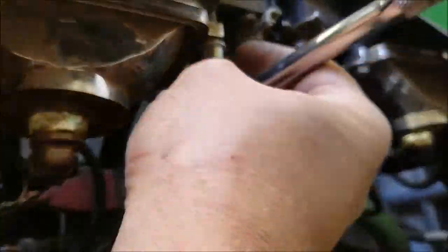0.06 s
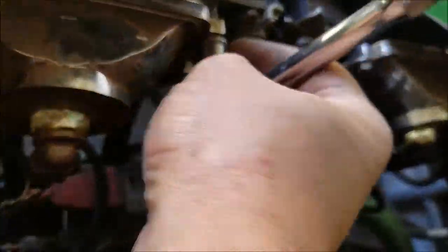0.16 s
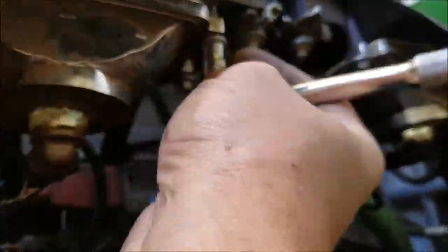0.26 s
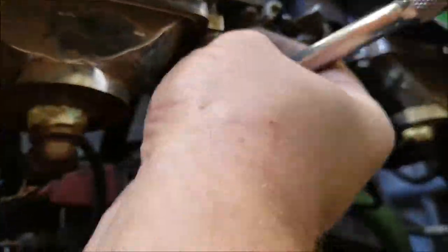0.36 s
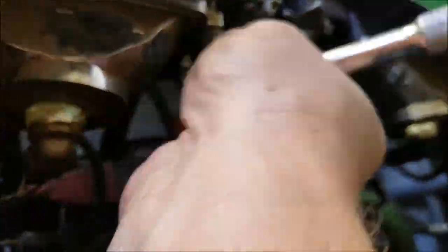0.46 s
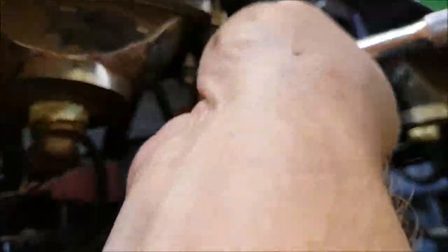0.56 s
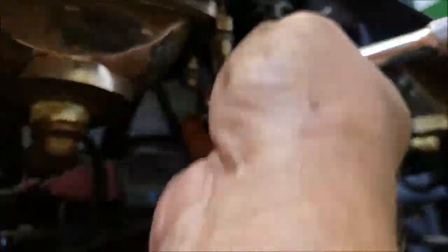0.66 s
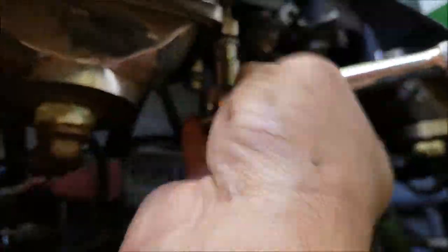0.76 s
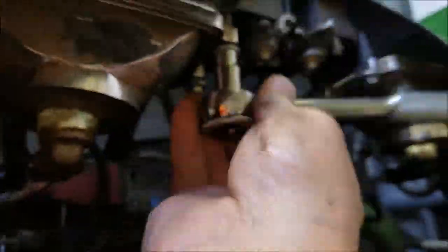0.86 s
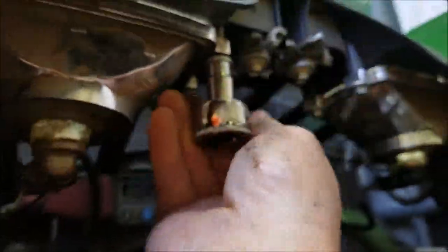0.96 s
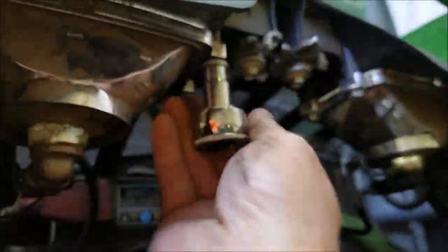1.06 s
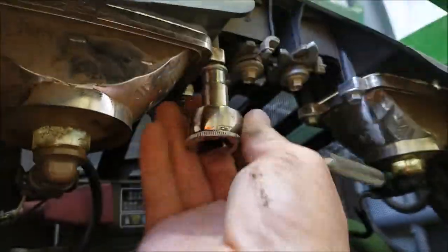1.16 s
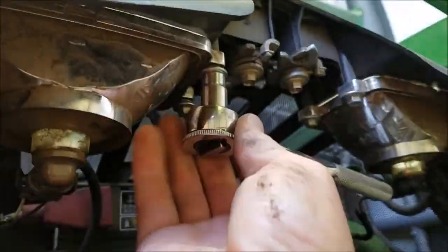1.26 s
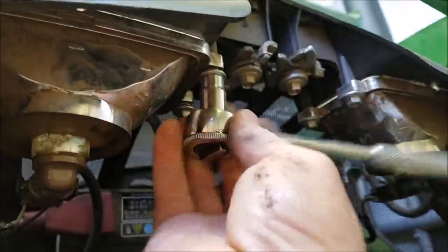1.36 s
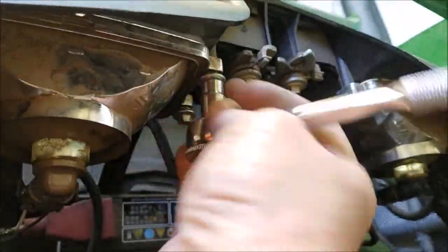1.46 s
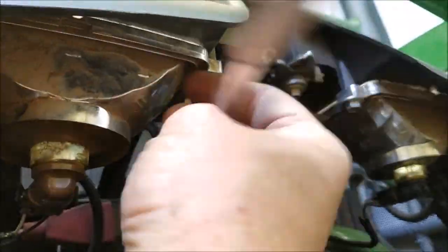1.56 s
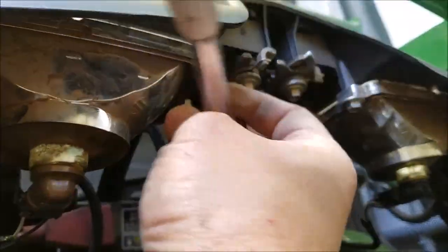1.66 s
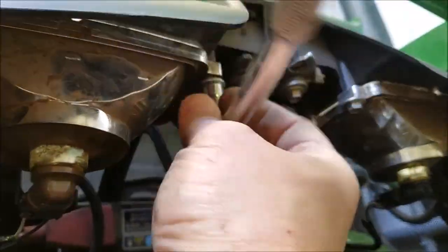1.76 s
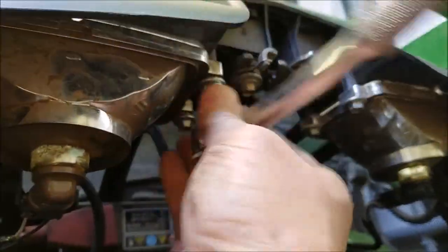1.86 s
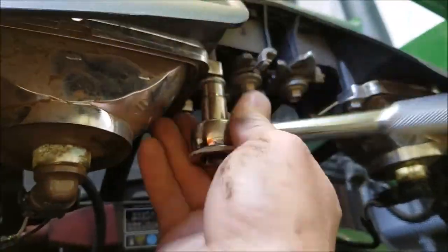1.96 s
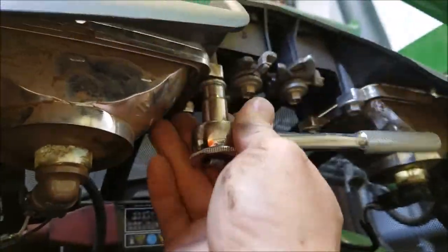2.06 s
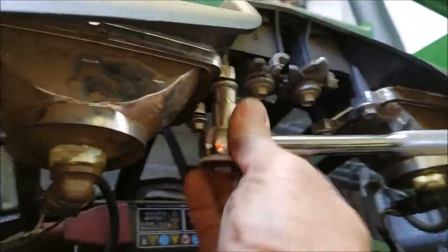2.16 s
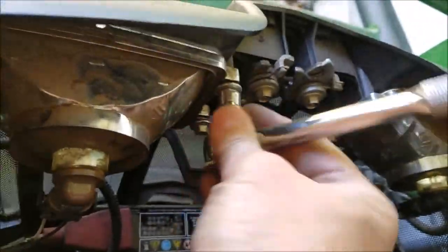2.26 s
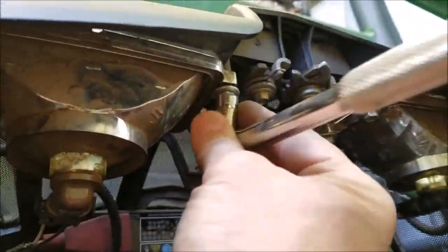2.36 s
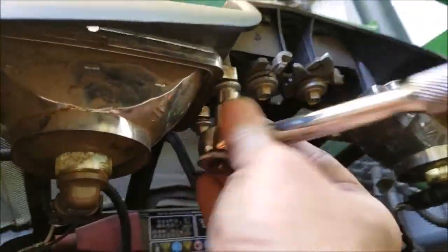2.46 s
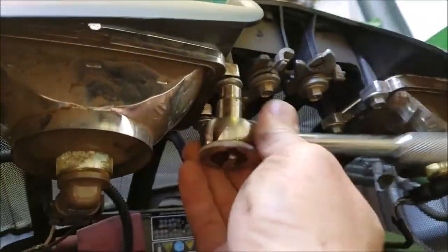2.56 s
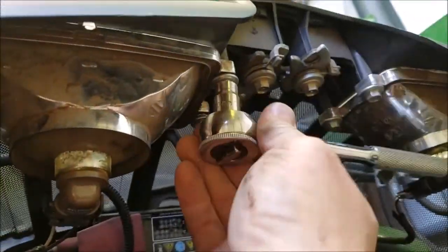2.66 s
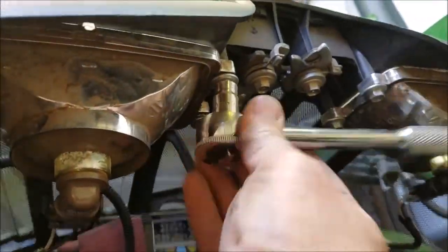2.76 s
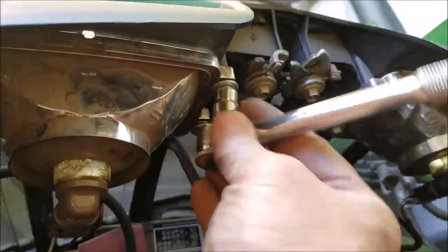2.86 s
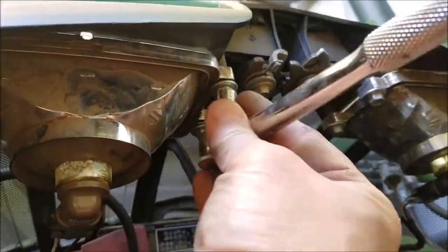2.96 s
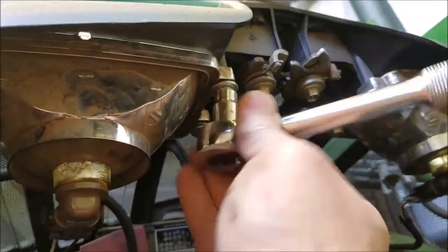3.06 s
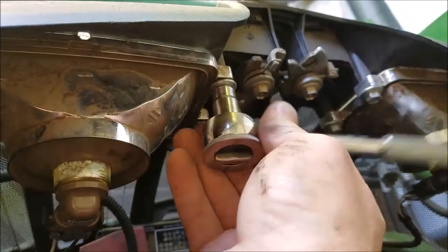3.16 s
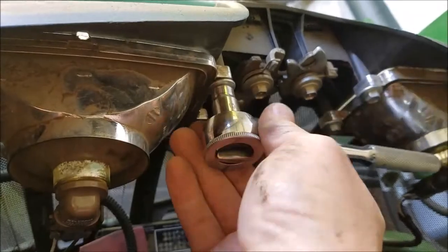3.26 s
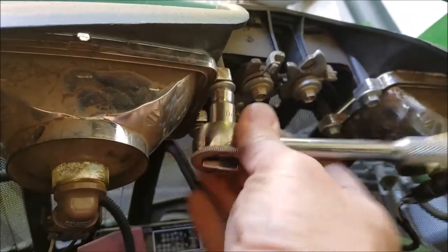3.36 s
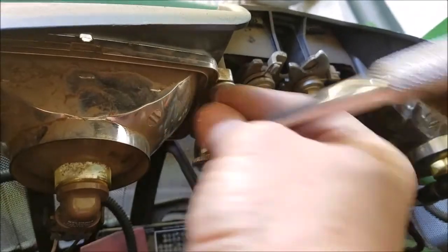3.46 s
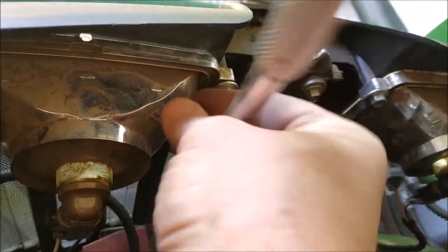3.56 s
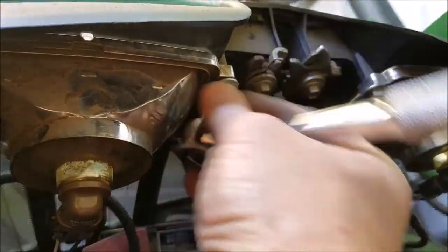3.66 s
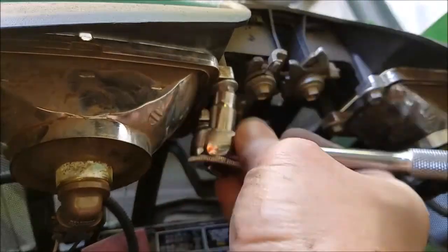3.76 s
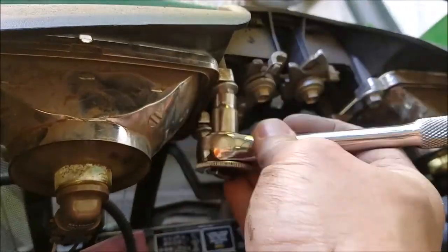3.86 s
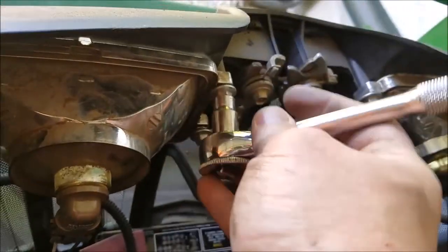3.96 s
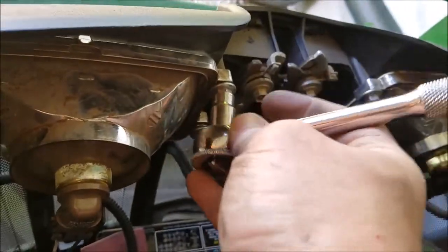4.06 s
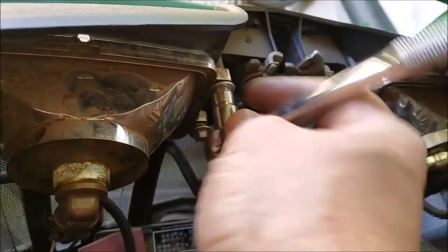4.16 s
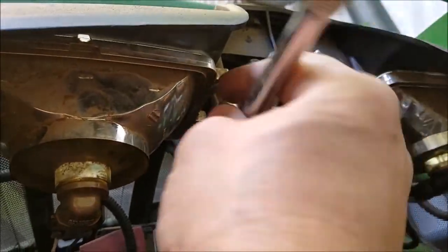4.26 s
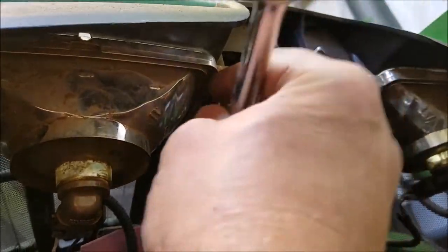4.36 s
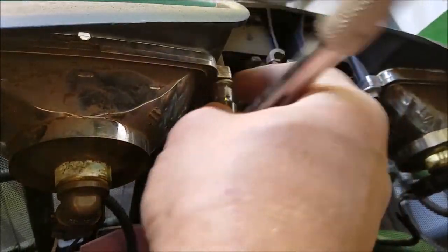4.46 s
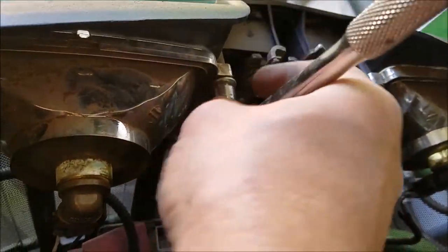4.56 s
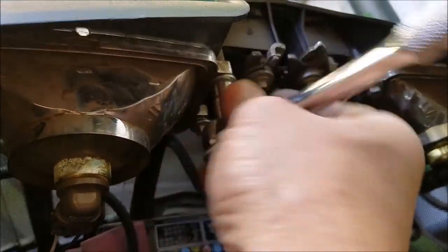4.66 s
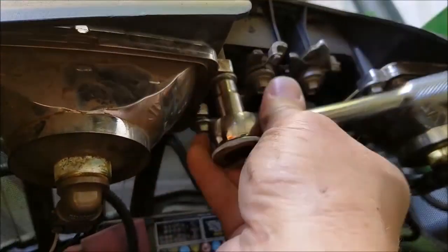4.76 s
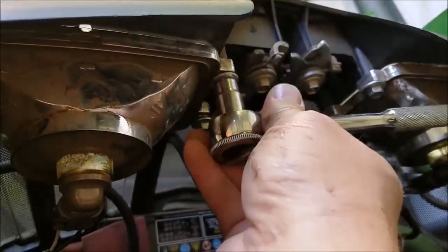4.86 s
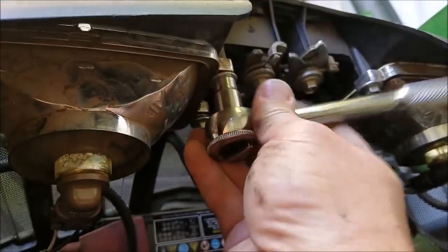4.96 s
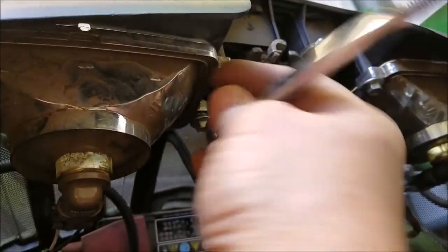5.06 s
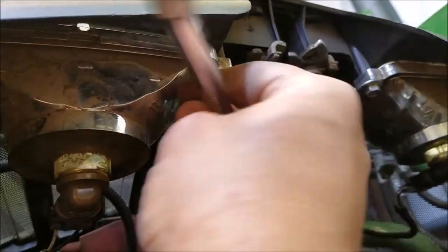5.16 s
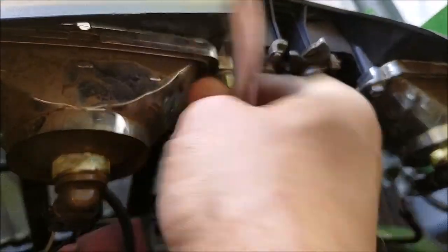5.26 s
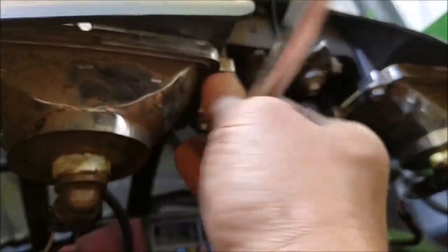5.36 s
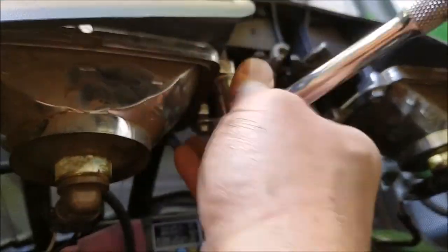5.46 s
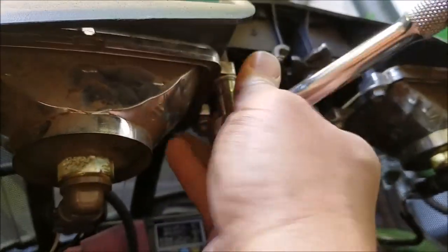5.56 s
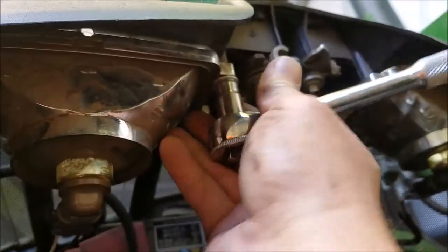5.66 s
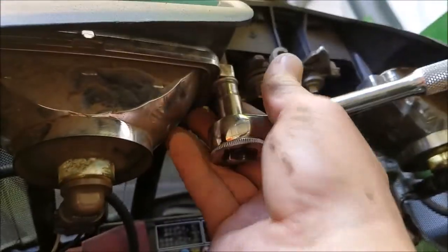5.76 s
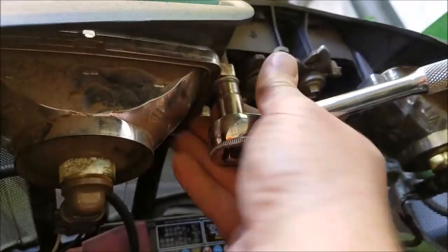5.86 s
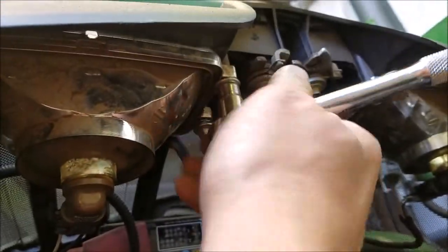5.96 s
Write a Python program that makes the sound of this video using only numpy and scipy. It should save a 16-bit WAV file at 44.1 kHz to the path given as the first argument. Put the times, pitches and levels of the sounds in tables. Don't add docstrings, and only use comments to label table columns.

```python
import sys
import numpy as np
from scipy import signal
from scipy.fft import rfft, irfft, next_fast_len
from scipy.io import wavfile
from scipy.ndimage import uniform_filter1d

SR = 44100
rng = np.random.default_rng(int(sys.argv[2]) if len(sys.argv) > 2 else 0)


def invert_db(level):
    return 10 ** (np.asarray(level, dtype=float) / 20)


def persist_wave(psi):
    counts = np.round(np.clip(psi, -1, 1) * 32767).astype(np.int16)
    wavfile.write(sys.argv[1], SR, np.atleast_2d(counts).T)


N = 265614


def evened(x):
    return x / np.sqrt(np.mean(x ** 2) + 1e-20)


def peaked(x, size):
    return x / np.sqrt(uniform_filter1d((x ** 2).mean(0), size).max())


def smoothed(x, size):
    return uniform_filter1d(uniform_filter1d(x, size), size)


def read(points, hz):
    f, value = np.transpose(points)
    return np.interp(np.log(hz + 1), np.log(f + 1), value)


def coloured(x, points):
    size = next_fast_len(x.shape[-1])
    gain = invert_db(read(points, np.fft.rfftfreq(size, 1 / SR)))
    return irfft(rfft(x, size) * gain, size)[..., :x.shape[-1]]


def band(x, lo_hz, hi_hz):
    return signal.sosfilt(signal.butter(3, [lo_hz, hi_hz], "band", fs=SR, output="sos"), x)


def ring(modes, t, spread_db, detune, rough):
    hz, db, t60 = np.transpose(modes)[:, :, None]
    luck = rng.standard_normal((3, 2, len(modes), 1))
    size = invert_db(db + spread_db * luck[0])
    steps = np.repeat(rng.standard_normal((2, len(modes), len(t) // 60)), 60, axis=2)
    flutter = 1 + rough * uniform_filter1d(steps, size=60)
    phase = 2 * np.pi * hz * (1 + detune * luck[1, :1]) * t + 3 * luck[2]
    out = (size * flutter * invert_db(-60 * t / t60) * np.sin(phase)).sum(1)
    return out / np.sqrt((size ** 2).sum(1).mean() / 2 * (1 + rough ** 2))


def puff(t, lo_hz, hi_hz, t60):
    return evened(band(rng.standard_normal((2, len(t))), lo_hz, hi_hz)) * invert_db(-60 * t / t60)


def bounces(x, span_s, size):
    luck, train = rng.random((2, 4)), np.zeros(600)
    train[0] = 1
    at = (20 + luck[0] * span_s * SR).astype(int).clip(1, 599)
    train[at] = size * luck[1]
    return signal.fftconvolve(x, train[None] / np.linalg.norm(train), axes=1)[:, :x.shape[1]]


def play(source, rows):
    mix = np.zeros((2, N))
    for s, *how in rows:
        sound = source(*how)
        part = mix[:, round(s * SR):][:, :sound.shape[1]]
        part += sound[:, :part.shape[1]]
    return mix


# f/Hz, level/dB, t60/s
HEAD = [(9720, -4, 0.052), (10000, -7.5, 0.03), (11725, -1.5, 0.04), (11950, -2.5, 0.056),
        (12330, 0.5, 0.053), (14000, -3, 0.035), (14200, 3, 0.044), (14460, -2.5, 0.0341),
        (15400, 0, 0.025)]
# f/Hz, level/dB per Hz
SNAP = [(200, -36.5), (434, -9), (2930, -13), (4100, -4.5), (7380, -8.5), (12200, -0.5), (15700, -2.5),
        (16500, -40)]
# f/Hz, level/dB, t60/s
FRAME = [(412.2, 5.5, 0.12), (462.6, 12.5, 0.077), (539.4, -1.5, 0.13), (653, -31.5, 0.017)]
# f/Hz, level/dB, t60/s
BASE = [(49.3, -16.5, .12), (92.5, -9.5, 0.12), (149.6, -7, 0.25), (193.6, -3.5, 0.24), (222.8, -1.5, 0.19),
        (287, -4, 0.16)]
# f/Hz, level/dB, t60/s
PANEL = [(826.3, 0.5, 0.18), (1233, 2, 0.17), (1642, -2, 0.14), (2070, -8.5, 0.081), (2202, 5.5, 0.081),
         (2563, 1, 0.33), (3170, -11, 0.017), (3740, 0.5, 0.086)]
HANDLE_HZ, HANDLE_T60_S = 4120, 0.075
SOCKET_HZ, SOCKET_T60_S = 7920, 0.035
LAND_S, CLANG_S = 0.0015, 0.0105
AFTER_CLANG = (0.3, 0.55)


def pawl(db, handle_db, socket_db, thud_db, gap_s):
    t = np.arange(3000) / SR
    land_s = LAND_S * rng.uniform(0.7, 1.4)
    rise = np.sin(np.pi / 2 * np.minimum(t / land_s, 1)) ** 2
    after = np.interp(handle_db, (-18, -2), AFTER_CLANG)
    clang = after + (1 - after) * invert_db(-60 * (np.maximum(t - land_s, 0) / CLANG_S) ** 2)

    fade = np.hanning(2 * len(t))[len(t):]
    after_ring = ring(HEAD * np.array([1, 1, 4.]), t, 6, 0.01, 0.8) * fade
    head = ring(HEAD, t, 4.5, 0.012, 0.6) * clang + invert_db(-28) * after_ring
    snap = evened(coloured(rng.standard_normal((2, len(t))), SNAP)) * clang * invert_db(-60 * t / 0.12)
    click = peaked((head + invert_db(-5.5) * snap) * rise, size=50)

    grip = invert_db(-60 * np.maximum(t - min(gap_s, 0.021), 0) / 0.01)
    handle = invert_db(handle_db + 1.5) * ring([(HANDLE_HZ, 0, HANDLE_T60_S)], t, 1.5, 0.006, 0.45) * grip
    socket = invert_db(socket_db + 1.5) * ring([(SOCKET_HZ, 0, SOCKET_T60_S)], t, 1.5, 0.012, 0.7) * grip

    body = ring(FRAME + BASE[2:], t, 3.5, 0.033, 0.24) * (1 - np.exp(-t / 0.0048))
    thud = invert_db(thud_db - 9.5) * peaked(body, size=300)
    panel = 1.1 * ring(PANEL, t, 2.2, 0.095, 0.19) + puff(t, 550, 3500, 0.094)
    side = invert_db(thud_db - 7.5) * panel
    return invert_db(db - 4.5) * (click + (handle + socket + side) * rise + thud)


# t/s, snap level/dB
SWING_1 = [(1.0158, -11.0), (1.0296, -15.0), (1.0445, -16.0), (1.0538, -16.5), (1.065, -10.5),
           (1.0732, -14.5), (1.0827, -13.0), (1.0922, -8.5), (1.0989, -11.5), (1.1094, -16.0),
           (1.1168, -11.0), (1.1266, -14.5), (1.134, -14.0), (1.1443, -13.0), (1.1512, -12.5),
           (1.1613, -17.0), (1.1667, -11.5), (1.1775, -12.0), (1.1815, -12.5), (1.193, -15.5),
           (1.1974, -12.5), (1.2102, -15.5), (1.2147, -15.0), (1.2294, -13.5), (1.2367, -14.0),
           (1.2518, -14.0), (1.2628, -9.0), (1.273, -21.0), (1.2784, -18.0)]
SWING_2 = [(1.8769, -12.0), (1.8886, -12.0), (1.9013, -9.0), (1.9149, -11.0), (1.9223, -9.5),
           (1.9339, -14.0), (1.941, -12.5), (1.9535, -12.0), (1.9602, -14.5), (1.9727, -12.5),
           (1.982, -13.0), (1.9963, -12.0), (2.0096, -12.5), (2.0264, -13.5)]
SWING_3 = [(2.4482, -13.5), (2.461, -9.5), (2.4731, -12.5), (2.485, -12.0), (2.4946, -14.5),
           (2.5082, -12.0), (2.5161, -13.0), (2.5297, -9.0), (2.5373, -12.0), (2.55, -11.0), (2.5596, -9.0),
           (2.5732, -11.5), (2.5835, -11.5), (2.6008, -13.0), (2.6134, -9.5)]
SWING_4 = [(3.0503, -13.0), (3.0539, -12.5), (3.0695, -10.5), (3.0854, -12.5), (3.0893, -11.0),
           (3.0994, -12.0), (3.1029, -14.0), (3.1125, -17.5), (3.1166, -11.0), (3.1318, -10.0),
           (3.1415, -11.5), (3.1458, -10.5), (3.1566, -13.5), (3.1611, -12.0), (3.1685, -14.5),
           (3.1735, -15), (3.1778, -12.0), (3.184, -16), (3.1913, -13.5), (3.1983, -14.5)]
SWING_5 = [(3.8434, -13.0), (3.8595, -10.0), (3.8724, -16.0), (3.8823, -14.0), (3.8916, -15.0),
           (3.9043, -10.5), (3.9148, -14.0), (3.9313, -14.0), (3.9443, -13.5)]
SWING_6 = [(4.7018, -10.5), (4.706, -19.0), (4.7141, -13.0), (4.7204, -9.0), (4.7311, -15.0),
           (4.7374, -10.5), (4.7485, -15), (4.7536, -9.5), (4.7607, -15.5), (4.7655, -15.0),
           (4.7753, -13.0), (4.7787, -12.0), (4.7841, -18.5), (4.7902, -7.5), (4.8073, -11.0),
           (4.8196, -9.5), (4.8345, -16), (4.8396, -11.5), (4.8517, -12.0), (4.8593, -9.0), (4.8732, -12.0)]
# teeth, loosest grip as share of the swing 0-1, handle ring/dB, socket ring/dB, frame thud/dB
SWINGS = [
    (SWING_1, 0.72, -15.5, -17, -27.5),
    (SWING_2, 0.49, -20.5, -19, -27),
    (SWING_3, 0.94, -25, -23, -27),
    (SWING_4, 0.58, -15.5, -17, -26),
    (SWING_5, 0.54, -26, -39.5, -29),
    (SWING_6, 0.62, -18, -18, -27),
]
# handle ring/dB, socket ring/dB, frame thud/dB
LONE = [
    (0.8082, -15, -18, -5, -4),
    (0.8383, -12.5, -25, -12, -27),
    (0.8653, -17, -37, -11, -6.5),
    (0.9724, -14.5, -47, -36, -21.5),
    (2.0563, -14, -16.5, -20, -16),
    (3.6249, -15.5, -38.5, -43.5, -9),
    (3.6738, -14, -27, -36, -24.5),
    (3.9716, -12, -12.5, -32.5, -17),
    (3.9965, -12.5, -33, -12, -19.5),
    (4.0663, -16, -15.5, -9.5, -11),
]
SCATTER_DB = 3
DAMPING_DB_PER_S = (-240, -120, 6.5)


def ratchet():
    drops = list(LONE)
    for swing, loosest, *ring_db in SWINGS:
        s, db = np.transpose(swing)
        away_s = abs(s - s[0] - loosest * (s[-1] - s[0]))
        luck = SCATTER_DB * rng.standard_normal((3, len(s)))
        relative = [top + loss * away_s - db + v
                    for top, loss, v in zip(ring_db, DAMPING_DB_PER_S, luck)]
        drops += zip(s, db, *relative)
    drops = sorted(drops)
    gaps_s = np.diff([row[0] for row in drops], append=N / SR)
    return play(pawl, [(*row, gap_s) for row, gap_s in zip(drops, gaps_s)])


def knock(db, base_db, panel_db, crack_db):
    t = np.arange(6000) / SR
    frame = 1.3 * ring(FRAME, t, 1.4, 0.012, 0.044) + 0.74 * puff(t, 250, 742, 0.11)
    frame = frame * (1 - np.exp(-t / 0.00078))
    base = ring(BASE, t, 3.6, 0.043, 0.033) + 1.01 * puff(t, 121, 346, 0.13)
    base = base * (1 - np.exp(-t / 0.005))
    panel = 0.25 * ring(PANEL, t, 2, 0.04, 1) * invert_db(-60 * t / 0.15)
    panel = panel + puff(t, 650, 2140, 0.058) + invert_db(-1.5) * puff(t, 2000, 3750, 0.047)
    crack = puff(t, 3700, 7000, 0.026) + invert_db(-3.5) * puff(t, 8000, 16500, 0.037)
    top = invert_db(panel_db + 6) * panel + invert_db(crack_db - 5.5) * crack
    body = peaked(bounces(frame, 0.00813, 0.53), size=200) + invert_db(base_db - 0.86) * peaked(base, size=400)
    return invert_db(db - 7) * (body + bounces(top * (1 - np.exp(-t / 0.0005)), 0.011, 0.3))


# base boom/dB, panel rattle/dB, crack/dB
KNOCKS = [(0.075, -32, 1, -2, 6), (0.1, -22.5, -24, 1, -3), (0.115, -21, -9, -6, -5),
          (0.584, -11, -2, -1, 14), (0.771, -8.5, -8.5, -3, 2.5), (0.861, -37, -7, -24, 22.5),
          (1.364, -32, -8, -4, -3), (1.858, -30.5, -5, -1, 4.5), (2.119, -26, -29.5, -14.5, -21),
          (2.695, -23.5, -7.5, -6, 3.5), (3.016, -33, 1.5, -1.5, -14), (3.04, -32, -21, 4.5, 18.5),
          (3.405, -31, -2.5, -7.5, -26), (3.477, -38.5, 2, 2, 13), (4.14, -31, 1.5, -0.5, -18),
          (4.678, -28.5, 4.5, 3.5, 9), (4.916, -31.5, -1.5, 4, -22), (5.693, -28, -7, -1.5, -19)]
# base boom/dB, panel rattle/dB
BUMPS = [(0.004, -37, -8, -2), (0.394, -38.5, -34, -3.5), (0.545, -60, -3, 10), (0.739, -32.5, -4, -14),
         (1.488, -43.5, 3, -13), (2.108, -33.5, 4, -12.5), (2.363, -47.5, -0.5, -4),
         (2.662, -37.5, 0.5, -8), (2.995, -36.5, -15.5, -4), (3.265, -35, 4, -16.5),
         (3.288, -44.5, 7.5, 13.5), (3.35, -38.5, 3.5, -2.5), (3.459, -34, -6, -8.5),
         (4.164, -41, -3, -1.5), (4.15, -42, -5.5, -2), (3.327, -40, -4, -5.5), (2.95, -51.5, -2.5, -2.5),
         (5.335, -52, -7, 5), (4.624, -36.5, -7.5, -9), (4.959, -32, 2.5, -4), (5.06, -35, -1, 1.5),
         (5.164, -47, -7, -6), (5.655, -39, 0, -8), (5.888, -33, -2.5, -6.5), (5.93, -48.5, 1.5, 2)]
BUMP_CRACK_DB = -5


def blows():
    soft = [(*row, row[-1] + BUMP_CRACK_DB) for row in BUMPS]
    return play(knock, sorted(KNOCKS + soft))


def ping(hz, db, t60):
    t = np.arange(6000) / SR
    return invert_db(db) * ring([(hz, 0, t60)], t, 0, 0, 0.35)[[0, 0]] * (1 - np.exp(-t * hz))


# t/s, f/Hz, level/dB, t60/s
PINGS = [(0.1, 1600, -32, 0.04), (0.585, 300, -31, 0.09), (0.59, 188, -26, 0.25), (0.772, 215, -28, 0.15),
         (0.772, 280, -26, 0.1), (0.772, 350, -24, 0.09), (0.772, 1640, -17, 0.1), (0.772, 1945, -23, 0.05),
         (0.865, 1000, -42, 0.05), (2.662, 1400, -48, 0.04), (2.774, 2190, -41, 0.1),
         (3.288, 2150, -39, 0.06), (3.405, 900, -45, 0.04), (3.477, 4300, -39, 0.025),
         (4.16, 4250, -49, 0.06), (4.572, 4900, -48, 0.04), (4.678, 2600, -32, 0.05),
         (5.693, 800, -46, 0.05), (5.693, 2900, -40, 0.04), (5.888, 2200, -40, 0.05)]


def pings():
    return play(ping, PINGS)


def tick(db):
    t = np.arange(1500) / SR
    snap = puff(t, 2600, 8000, 0.019) + invert_db(2) * puff(t, 7000, 20000, 0.0081)
    return invert_db(db - 3.5) * bounces(snap, 0.0026, 0.35)


# t/s, level/dB
TICKS = [(0.804, -17), (1.2981, -46), (1.41, -36.5), (1.869, -25), (3.035, -39), (3.2199, -43),
         (3.3661, -35.5), (3.4764, -35), (4.189, -43), (4.193, -47), (4.572, -35.5), (4.9611, -36),
         (5.0193, -42), (5.0727, -42.5), (5.086, -48), (5.098, -33.5), (5.1402, -44.5), (5.639, -42.5),
         (1.627, -53.5), (5.291, -61.5), (5.306, -43), (5.612, -50), (5.95, -46.5), (4.308, -54.5),
         (4.363, -53), (5.033, -48), (3.022, -46), (5.622, -52), (5.939, -49)]


def ticks():
    return play(tick, TICKS)


# t/s of the strongest rub, level/dB, fading/s, slide over rumble/dB
REGRIPS = [(0.125, -44.5, 0.093, -2.5), (0.41, -60, 0.16, 4), (0.72, -55.5, 0.25, -2),
           (1.33, -54.5, 0.41, -9), (1.75, -53, 0.39, -1), (2.15, -52.5, 0.11, -2), (2.42, -54.5, 0.15, -5),
           (2.8, -54, 1, -0.5), (3.25, -50.5, 0.24, 0.5), (3.5, -59, 1, -9), (4.156, -46, 0.05, -4.5),
           (4.438, -61, 0.23, 7), (4.929, -40.5, 0.089, -1), (5.101, -58.5, 0.074, 9),
           (5.321, -60.5, 0.069, 11.5), (5.439, -66, 0.13, 12), (5.669, -53.5, .18, -3.5),
           (5.94, -54.5, 0.1, 0.5)]
RUB_FADE_DB, RUB_RISE = -11.5, 0.54


def rubbing():
    t = np.arange(0, N + 64, 64) / SR
    s, db, fading_s, slide_db = np.transpose(REGRIPS)[:, :, None]
    away = np.where(t < s, (s - t) / RUB_RISE, t - s) / fading_s
    levels = [np.sqrt((invert_db(top + RUB_FADE_DB * away) ** 2).sum(0)) for top in (db, db + slide_db)]
    return [np.interp(np.arange(N) / SR, t, level) for level in levels]


# f/Hz, width/Hz, level/dB
SCRAPE = [(1500, 300, -13), (2200, 250, -12), (2750, 350, -16), (3450, 300, -15), (5000, 500, -22)]


def scrape():
    out = 0
    for hz, width_hz, db in SCRAPE:
        lump = evened(smoothed(rng.standard_normal(N), 2000))
        noise = band(rng.standard_normal((2, N)), hz - width_hz / 2, hz + width_hz / 2)
        out = out + invert_db(db) * evened(noise * invert_db(3.5 * lump))
    return out


def hands():
    slow, fast = [evened(smoothed(rng.standard_normal(N), size)) for size in (900, 350)]
    grains = (rng.random((2, N)) < 400 / SR) * invert_db(4 * rng.exponential(1, N).clip(0, 3)) * 3
    noise = rng.standard_normal((3, 2, N))
    rumble = evened(band(noise[0], 79, 1400) * invert_db(3.38 * slow))
    rub = evened(band(noise[1] + grains, 1300, 5000) * invert_db(1.5 * slow + 1.5 * fast))
    hiss = evened(band(noise[2] + grains, 5400, 20000) * invert_db(1.7 * fast))
    press, slide = rubbing()
    return press * invert_db(3.5) * rumble + slide * (invert_db(-6.5) * rub + invert_db(-10) * hiss + scrape())


def tone(rows, waver, flicker_db, size):
    s, *columns = np.transpose(rows)
    t = np.arange(N) / SR
    hz, db = [np.interp(t, s, c) for c in columns]
    on = uniform_filter1d(1. * (t > s[0]) * (t < s[-1]), 600)
    drift, flicker = [evened(smoothed(v, size)) for v in rng.standard_normal((2, N))]
    phase = 2 * np.pi * np.cumsum(hz * (1 + waver * drift)) / SR
    return np.sqrt(2) * on * invert_db(db + flicker_db * flicker) * np.sin(phase)


# t/s, f/Hz, level/dB
SQUEAK = [
    (2.81, 12250, -78),
    (2.85, 12700, -74),
    (2.88, 12550, -73),
    (2.92, 12050, -74),
    (2.95, 11950, -75),
    (2.98, 12250, -74),
    (3.02, 12050, -75),
]
# t/s, f/Hz, level/dB
WHINE = [
    (2.79, 3380, -65),
    (2.94, 3250, -70),
]


def squeaks():
    return tone(SQUEAK, 0.009, 7.8, size=120) + tone(WHINE, 0.02, 3.7, size=120)


# f/Hz, t60/s
SHOP = [(200, 0.37), (700, 0.37), (2000, 0.3), (5000, 0.26), (15000, 0.26)]


def shop(x):
    taps = np.zeros((2, SR // 2))
    grid = np.arange(200, SR // 2 - 20, 20)
    at = grid + rng.integers(0, 20, (2, len(grid)))
    np.put_along_axis(taps, at, rng.choice([-1., 1.], at.shape), 1)
    hz, t, z = signal.stft(taps, SR, nperseg=256)
    tail = signal.istft(z * invert_db(-60 * t / read(SHOP, hz)[:, None]), SR, nperseg=256)[1]
    return signal.fftconvolve(x, tail / np.linalg.norm(tail[0]), axes=1)[:, :N]


# t/s, f/Hz, level/dB
HUM = [
    (0.0, 67.25, -60),
    (1.42, 66.04, -67),
    (3.42, 65.6, -51.5),
    (6.02, 69.7, -69),
]
# t/s, f/Hz, level/dB
HUM_UPPER = [
    (3.6, 125.3, -58.5),
    (4.954, 131.9, -61.5),
    (5.2, 123, -60.5),
]


def engine():
    return tone(HUM, 0.035, 3, size=3000) + tone(HUM_UPPER, 0.0279, 2.8, size=3000)


# f/Hz, level/dB per Hz
AIR = [(12, -39), (20, -2.5), (114, -1), (650, -25.5), (2500, -25.5), (7300, -41), (15200, -36.5),
       (16500, -48)]
AIR_DB = -53


def air():
    return invert_db(AIR_DB) * evened(coloured(rng.standard_normal((2, N)), AIR))


def scene():
    tool = ratchet() + blows() + pings() + ticks()
    return tool + invert_db(-16) * shop(tool) + hands() + squeaks() + engine() + air()


def roll_off(x):
    return signal.sosfilt(signal.butter(12, 16980, fs=SR, output="sos"), x)


# f/Hz, level/dB
BALANCE_DB = [(60, -1), (180, 2), (550, 1.5), (1650, 6), (4970, 4.5), (15000, -6)]
# f/Hz, share 0-1
SAME = [(40, .55), (80, .75), (160, .98), (350, .96), (700, .6), (1300, .68), (2500, .3), (16000, .1)]
# f/Hz, lead/rad
LEAD = [(350, 0), (800, 1.1), (1200, 2.4), (1900, 2.4), (2800, 1.6)]
EDGE_HZ, TOP_HZ = 15900, 16900


def record(dry):
    size = next_fast_len(N)
    hz = np.fft.rfftfreq(size, 1 / SR)
    a, b = rfft(dry, size)
    same = np.clip(read(SAME, hz), 0, 1)
    tilt = invert_db(read(BALANCE_DB, hz) / 2)
    right = (same * a + np.sqrt(1 - same ** 2) * b) * np.exp(-1j * read(LEAD, hz))
    ports = irfft(np.array([a * tilt, right / tilt]), size)[:, :N]
    ports = np.tanh(ports)
    edge = 0.9 * signal.firwin(255, EDGE_HZ, fs=SR) + 0.1 * signal.firwin(255, TOP_HZ, fs=SR)
    mix = signal.oaconvolve(ports, edge[None], "same", axes=1)
    return roll_off(mix)


dry = scene()
out = record(dry)
persist_wave(out)
```